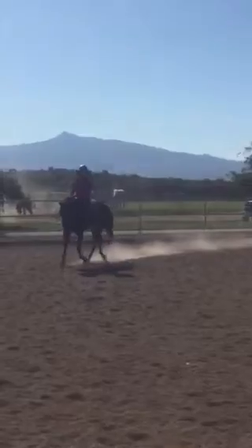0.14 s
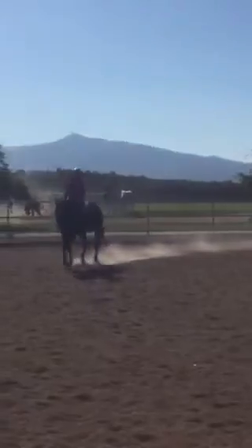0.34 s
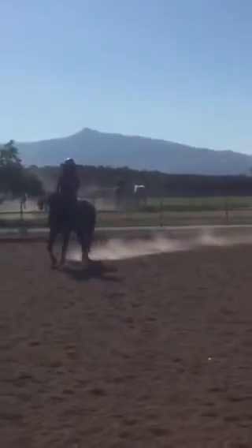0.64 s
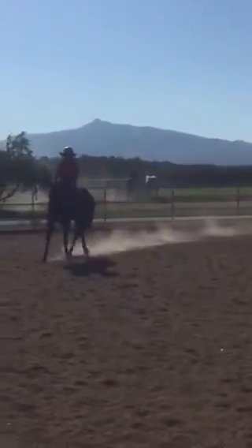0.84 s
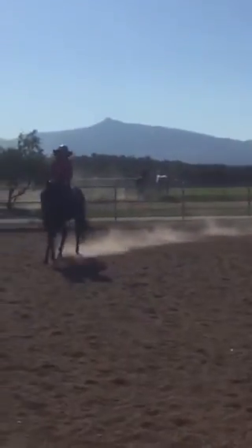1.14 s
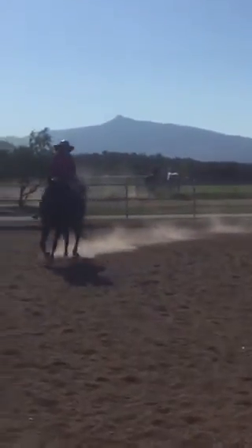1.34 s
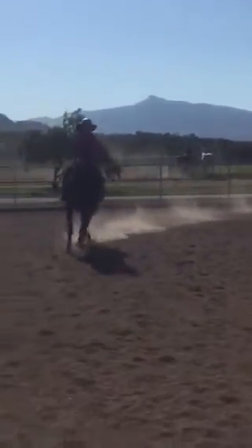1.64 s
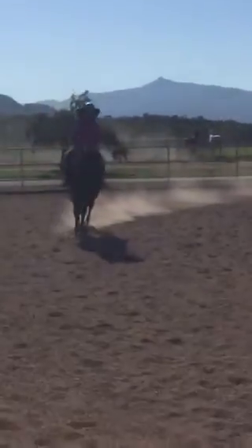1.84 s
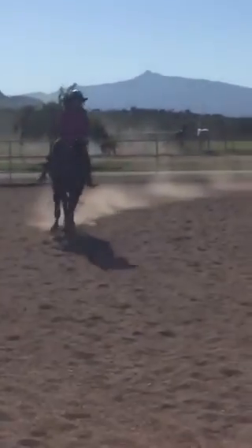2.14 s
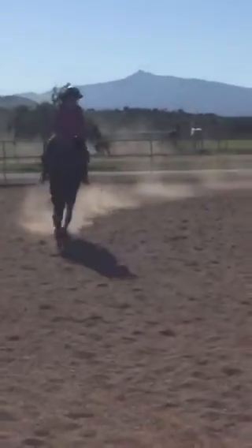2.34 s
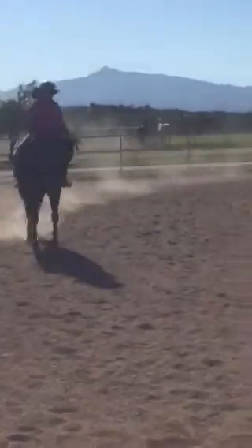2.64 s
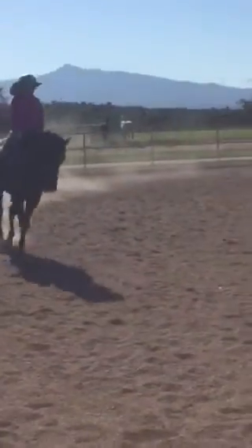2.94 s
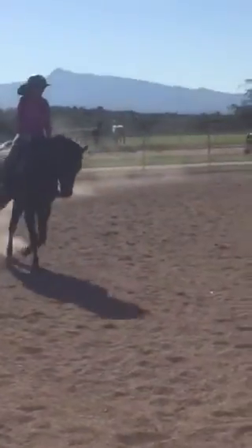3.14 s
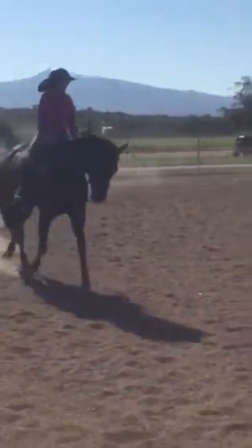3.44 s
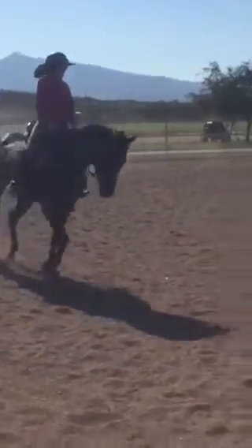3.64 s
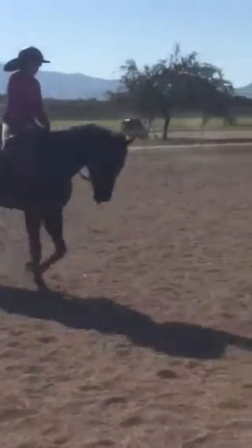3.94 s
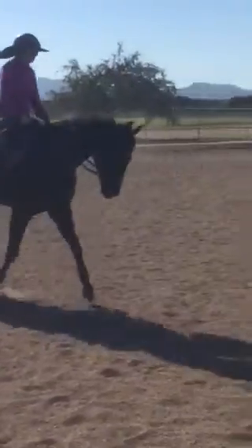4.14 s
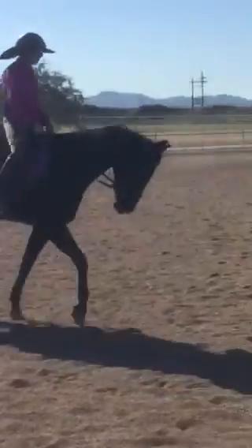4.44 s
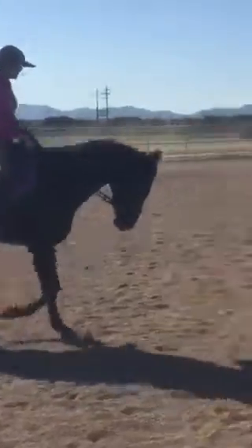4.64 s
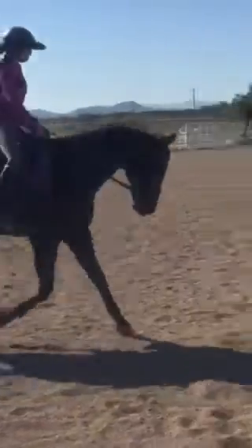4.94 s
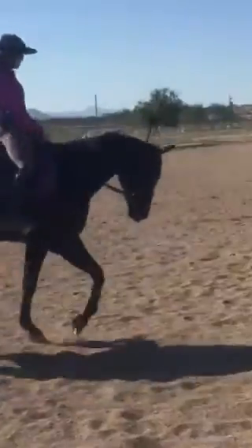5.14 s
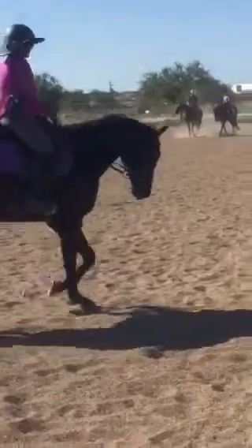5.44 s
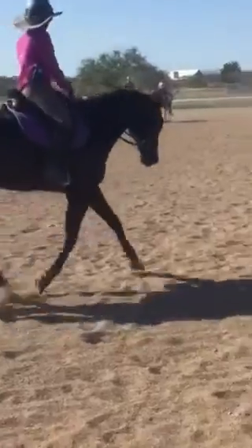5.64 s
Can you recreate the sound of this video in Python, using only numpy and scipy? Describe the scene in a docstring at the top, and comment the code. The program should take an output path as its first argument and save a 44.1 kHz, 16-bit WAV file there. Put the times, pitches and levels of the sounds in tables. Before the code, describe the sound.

A horse trots nearer across a sandy outdoor arena, heard through a hand-held phone. At first the air is quiet, with a faint hiss and low rumble of wind and ground, weak muffled hoof thuds and soft puffs of breath. A distant bird whistles at about 0.1, 1.5, 2.9 and 4.3 seconds, alternating with quick falling trills near 0.8, 2.2, 3.6 and 5.1. A small dry rustle comes at 1 second and a light click at 1.7. Fingers knock the phone case at 2.7, then loudest at 3.0 and 3.1, hard and hollow with a tiny bounce. From 3.3 the hoofbeats are closer and fuller, with dull scuffs, crunches, gritty ticks and bright swishes of sand from about 3.7 to 5.6. The rumble swells in lumps, strongest around 4.2. Two more clacks fall at about 5.55 and 5.6, then a short high chirp ends it.

```python
"""Open arena: a horse trots nearer on sand, heard from a hand-held phone.
Hooves are decaying low sines with noise crunches; breath is noise through resonances, in swells, a few of
them dull hoof scuffs; sand is clumped random grains. Fingers ring the modes of the phone's case. A far bird
sings swept sines with echoes. A dry rustle, the rumble of wind and ground and still air are shaped noise."""
import sys
import numpy as np
from scipy import signal
from scipy.fft import rfft, irfft, next_fast_len
from scipy.io import wavfile

SR = 44100
rng = np.random.default_rng(int(sys.argv[2]) if len(sys.argv) > 2 else 0)


def to_wav(s):
    """Save 16-bit WAV."""
    ch = np.atleast_2d(s).T  # columns
    pcm = np.round(np.clip(ch, -1, 1) * 32767)  # PCM
    wavfile.write(sys.argv[1], SR, pcm.astype(np.int16))


N = 255503


def from_db(db):
    """Decibels to amplitude gain."""
    return 10 ** (np.asarray(db) / 20)


def rms_one(x):
    """Scale to unit rms."""
    return x / np.sqrt(np.mean(x ** 2) + 1e-20)


def in_time(rows):
    """Interpolate each column of a time table to one value per sample."""
    t_s, *columns = np.transpose(rows)
    return [np.interp(np.arange(N) / SR, t_s, column) for column in columns]


def coloured(x, spectrum):
    """Filter by a (f/Hz, level/dB) curve on a log frequency axis; rms 1."""
    size = next_fast_len(N)
    hz = np.maximum(np.arange(size // 2 + 1) * SR / size, 1)
    curve_hz, curve_db = np.transpose(spectrum)
    gain = from_db(np.interp(np.log(hz), np.log(curve_hz), curve_db))
    return rms_one(irfft(rfft(x, size) * gain, size)[:N])


def drift(rate_hz):
    """Slow random curve: noise through two equal low-pass poles at rate_hz; rms 1."""
    r = np.exp(-2 * np.pi * rate_hz / SR)
    noise = rng.standard_normal(N + SR)
    return rms_one(signal.lfilter([1], [1, -2 * r, r * r], noise)[SR:])


def butter(order, hz, kind, x):
    """Butterworth filter."""
    return signal.sosfilt(signal.butter(order, hz, kind, fs=SR, output="sos"), x)


def add(out, t_s, sound):
    """Mix a short sound in at t_s."""
    start = round(t_s * SR)
    out[start:start + len(sound)] += sound[:N - start]


# hooves landing in sand: t/s, thud level/dB, crunch level/dB
HOOVES = [(0.106, -50, -90), (0.87, -50, -72), (0.961, -59, -65), (1.126, -63, -72.5), (1.796, -48, -82),
          (2.135, -52, -83), (2.164, -44.5, -87), (2.195, -46, -73), (2.422, -47.5, -74), (2.613, -51, -78),
          (2.789, -71, -75), (3.276, -41, -82), (3.358, -58.5, -63.5), (3.524, -56, -69.5),
          (3.553, -53, -79), (3.617, -43, -66.5), (3.706, -54, -59.5), (3.866, -40.5, -74.5),
          (4.007, -39, -76), (4.087, -42.5, -68.5), (4.341, -47, -65.5), (4.461, -46, -85),
          (4.713, -50, -74), (4.795, -36.5, -80), (4.811, -43.5, -63), (5.041, -48, -72.5),
          (5.076, -44, -68), (5.306, -50, -70), (5.46, -48, -72)]
THUD_MEDIAN_HZ, THUD_SPREAD_DB = 105.3, 1.15  # spread: 20 log10 of the pitch ratio


def hooves():
    """Each landing: a soft low push and a short crunch of packed sand."""
    out, t = np.zeros(N), np.arange(SR // 8) / SR
    for t_s, thud_db, crunch_db in HOOVES:
        thud_hz = THUD_MEDIAN_HZ * from_db(THUD_SPREAD_DB * rng.standard_normal())
        push = (t / 0.0077) * np.exp(1 - t / 0.0096)
        thud = np.sin(2 * np.pi * thud_hz * t) * push
        grains = rms_one(butter(3, [450, 2600], "band", rng.standard_normal(len(t))))
        crunch = grains * np.minimum(t / 0.0019, 1) * np.exp(-t / 0.015)
        add(out, t_s, from_db(thud_db) * thud + from_db(crunch_db) * crunch)
    return out


def resonate(x, hz, width_hz):
    """Two identical resonators in series, for steep flanks; about unit gain on top."""
    r = np.exp(-np.pi * width_hz / SR)
    stage = [(1 - r * r) / 2, 0, (r * r - 1) / 2, 1, -2 * r * np.cos(2 * np.pi * hz / SR), r * r]
    return signal.sosfilt([stage, stage], x)


# nostril resonances: f/Hz, width of one stage/Hz, level/dB
NOSTRILS = [(651, 317, -2), (1095, 340, 2.5), (1438, 126, -4.5), (1873, 224, -7), (2400, 290, -14.5)]
# puffs of breath, and short dull hoof scuffs (4.721, 5.096, 5.178, 5.472) made with the same resonances:
# middle t/s, half length/s, level/dB, lowest resonance/dB, tilt of the upper ones/(dB per octave)
PUFFS_AND_SCUFFS = [(0.241, 0.079, -68.5, -3, 1), (0.499, 0.069, -72.5, -17, -7),
                    (0.682, 0.1, -75, -20, -10), (0.979, .073, -63, -3.5, -2), (1.226, 0.053, -72, -18, -3),
                    (1.409, 0.032, -61.5, -24, -20), (1.697, 0.03, -62.5, 14.5, 7),
                    (1.808, 0.15, -74, 8.5, -31), (1.961, 0.053, -64, -34, -10),
                    (2.132, 0.086, -65.5, 3.5, -0.5), (2.25, 0.067, -73.5, 5.5, -2),
                    (2.555, 0.079, -66.5, -22, -8), (2.829, 0.2, -65, -15, -4.5),
                    (3.017, 0.082, -65, -7, -1), (3.095, 0.083, -65.5, -12, -12.5),
                    (3.258, 0.047, -56.5, -2.5, -22), (3.388, 0.053, -57.5, 3.5, -30),
                    (3.553, 0.057, -65, -11, -20), (4.003, 0.044, -60.5, 0.5, -8.5),
                    (4.376, 0.2, -71, 4.5, -8), (4.54, 0.084, -67, 8, -6), (4.661, 0.093, -65, -6, 2),
                    (4.721, 0.018, -54, 3.5, -8), (5.096, .038, -59.5, 5, -2),
                    (5.178, 0.028, -60, 12.5, -17), (5.31, 0.047, -67, -6, -22),
                    (5.472, 0.021, -58.5, 5.5, -3.5), (5.649, 0.094, -71.5, 5, 2)]
BREATH_DB = -73.5  # at 0 dB approach


def breath_and_scuffs(near_db):
    """Fluttering noise through nostril resonances: steady breath, puffs, and short dull hoof scuffs."""
    air = rng.standard_normal(N) * from_db(3.4 * drift(33))
    bands = np.array([from_db(level_db) * resonate(air, hz, width_hz)
                      for hz, width_hz, level_db in NOSTRILS])
    bands = bands / np.sqrt(np.mean(bands.sum(axis=0) ** 2))
    upper_hz = np.array(NOSTRILS)[1:, 0]
    octaves = np.log2(upper_hz / upper_hz[0])
    gains = np.ones_like(bands) * from_db(BREATH_DB + near_db + 1.17 * drift(15))
    t = np.arange(N) / SR
    for t_s, half_s, level_db, low_db, tilt_db in PUFFS_AND_SCUFFS:
        span = slice(max(round((t_s - half_s) * SR), 0), round((t_s + half_s) * SR))
        swell = np.cos(np.pi / 2 * (t[span] - t_s) / half_s) ** 2
        band_db = level_db + np.r_[low_db, tilt_db * octaves]
        gains[:, span] += from_db(band_db)[:, None] * swell
    return (gains * bands).sum(axis=0)


# colour of the grains: f/Hz, level/dB (relative density)
SAND = [(3500, -26), (5200, -16.5), (6000, -0.5), (7000, -1.5), (8000, -6.5), (9500, -2.5), (12600, -2),
        (15500, -11.5)]
# sand thrown up by a hoof: t/s, level/dB, fall time/s
SWISHES = [(1.21, -82, 0.028), (2.19, -81, 0.04), (2.316, -82, 0.03), (2.66, -85, 0.062),
           (3.356, -77.5, 0.035), (3.403, -78, 0.034), (3.685, -80.5, 0.043), (3.758, -69.5, 0.021),
           (3.798, -80, 0.05), (3.855, -69, 0.019), (4.075, -65.5, 0.018), (4.148, -69, 0.024),
           (4.18, -84, 0.1), (4.394, -73.5, 0.041), (4.491, -74.5, 0.031), (4.548, -82.5, 0.055),
           (4.807, -68, 0.036), (4.859, -72, 0.047), (4.944, -75.5, 0.037), (5.016, -86, 0.08),
           (5.154, -61.5, 0.018), (5.268, -71.5, 0.023), (5.303, -76, 0.034), (5.445, -81, 0.031),
           (5.627, -67.5, 0.039)]
GRAINS_PER_S = 9000  # median
TRICKLE_DB, TRICKLE_FOLLOWS = -87, 0.8  # at 0 dB approach; share of the approach in dB


def sand(near_db):
    """Dense clumped grains of random size; a steady trickle, and throws that start suddenly."""
    sizes = from_db(3.56 * np.minimum(rng.exponential(1, N), 5)) * rng.choice([-1, 1], N)
    falls = rng.random(N) < GRAINS_PER_S * from_db(3.0 * drift(40)) / SR
    level, t = from_db(TRICKLE_DB + TRICKLE_FOLLOWS * near_db), np.arange(SR // 4) / SR
    for t_s, level_db, fall_s in SWISHES:
        add(level, t_s, from_db(level_db) * np.minimum(t / 0.0071, 1) * np.exp(-(t / fall_s) ** 2))
    return coloured(sizes * falls, SAND) * level


# single larger grains: t/s, level/dB
GRIT = [(0.7258, -63), (1.3114, -62), (1.7769, -65.5), (3.059, -60), (3.329, -76), (3.5256, -58.5),
        (3.7614, -61.5), (4.1634, -62.5), (4.2959, -65), (5.1586, -57), (5.39, -61.5)]


def grit():
    """Each larger grain ticks: a decaying noise burst, band-passed."""
    out, t = np.zeros(N), np.arange(SR // 100) / SR
    for t_s, level_db in GRIT:
        burst = rng.standard_normal(len(t)) * np.exp(-t / 0.0015)
        add(out, t_s, from_db(level_db) * butter(1, [2500, 14000], "band", burst))
    return out


def ring(clicks, hz, t60_s):
    """A unit click sets a decaying sine of starting height 1 ringing."""
    r, w = from_db(-60 / (t60_s * SR)), 2 * np.pi * hz / SR
    return signal.lfilter([0, np.sin(w)], [1, -2 * r * np.cos(w), r * r], clicks + 1e-18)


# knocks: t/s, ring level/dB, body level/dB, crack level/dB, bounce below first contact/dB, body lag/s
KNOCKS = [(1.187, -69.5, -67, -90, 27, 0.0034), (1.471, -69, -46, -80, 22, 0.0021),
          (1.6894, -45, -45, -48, -2, .003), (2.7107, -37.5, -33.5, -42.5, 5.5, 0.0045),
          (2.904, -57, -40, -94, 11, 0.0016), (3.0236, -29, -26, -32, 15, 0.0021),
          (3.1356, -23, -21, -29.5, 22, .0037), (5.16, -62, -57, -81, 24, 0.0032),
          (5.5536, -41, -42, -45, -1.5, 0.0035), (5.608, -34, -30, -41, 16, 0.00532)]
# modes of the case, low, middle and high: f/Hz, level/dB, t60/s
CASE_BODY = [(108, -24, 0.079), (228, 4, 0.052), (300, -5, 0.042), (366, -7, 0.042), (616, -13, 0.046),
             (790, -15, 0.035)]
CASE_RING = [(1126, 8, 0.014), (1341, 10, .010), (1897, 0, 0.014), (2410, 4, 0.0073)]
CASE_CRACK = [(4435, 2, 0.0056), (5030, 6, 0.0035), (6910, 8.5, 0.002), (9170, 4, 0.0012),
              (10740, 1.5, 0.0013)]
BOUNCE_S, BOUNCE_DULL_DB = 0.0027, 17  # delay; extra loss of crack
BODY_SOFT_HZ, BUZZ_DB = 910, -10  # low-pass softening the body's start; buzz re ring level


def contacts():
    """Every knock touches twice: first contact, then a bounce with a duller crack."""
    first = np.array(KNOCKS)
    bounce = first + [BOUNCE_S, 0, 0, -BOUNCE_DULL_DB, 0, 0]
    bounce -= first[:, 4:5] * [0, 1, 1, 1, 0, 0]
    return np.r_[first, bounce]


def case_modes(rows):
    """Contacts ring all modes of the case; lower waves arrive later, the body swings by its own lag."""
    out = np.zeros(N)
    for modes, level_db in zip((CASE_RING, CASE_BODY, CASE_CRACK), rows[:, 1:4].T):
        for hz, mode_db, t60_s in modes:
            spot_db = 2.5 * rng.standard_normal(len(rows))  # each contact falls on another spot
            # harder knocks are shorter contacts and reach the highest modes
            harder_db = 0.93 * (level_db + 36) * max(np.log2(hz / 5000), 0)
            lag_s = rows[:, 5] if modes is CASE_BODY else 0.00048 + 0.66 / hz
            clicks = np.zeros(N + SR)
            at = ((rows[:, 0] + lag_s) * SR).round().astype(int)
            clicks[at] = from_db(level_db + mode_db + spot_db + harder_db)
            rung = ring(clicks[:N], hz, t60_s)
            out += butter(2, BODY_SOFT_HZ, "low", rung) if modes is CASE_BODY else rung
    return out


def case_buzz(rows):
    """Loose parts buzz briefly after each contact: decaying band noise."""
    out, t = np.zeros(N), np.arange(SR // 20) / SR
    for t_s, ring_db in rows[:, :2]:
        burst = rng.standard_normal(len(t)) * np.exp(-t / 0.005)
        add(out, t_s, from_db(ring_db + BUZZ_DB) * butter(2, [450, 4000], "band", burst))
    return out


def knocks():
    """Fingers knock on the phone's case: ringing modes and buzzing parts."""
    rows = contacts()
    return case_modes(rows) + case_buzz(rows)


def note(rows, level_db, pitch_factor, rough):
    """A sine on a pitch curve with soft ends; moving air on the long path makes it flutter."""
    at_s, hz, shape_db = np.transpose(rows)
    t = np.arange(at_s[0], at_s[-1], 1 / SR)
    ends = np.clip(np.minimum(t - at_s[0], at_s[-1] - t) / 0.0013, 0, 1)
    flutter = np.interp(t, at_s[0] + 0.002 * np.arange(40), rng.standard_normal(40))
    level = np.sqrt(2) * from_db(level_db + np.interp(t, at_s, shape_db))
    phase = 2 * np.pi * np.cumsum(pitch_factor * np.interp(t, at_s, hz)) / SR
    return level * ends * (1 + rough * flutter) * np.sin(phase)


# whistled phrases: main note t/s, main level/dB, upstroke level/dB, after-notes level/dB
WHISTLES = [(0.07, -67, -84.5, -79), (1.459, -67.5, -88, -77.5), (2.927, -68, -84, -91),
            (4.347, -65, -95, -77)]
# notes of the phrase: t from main note/s, f/Hz, level/dB; AFTER_NOTES lists several notes
UPSTROKE = [(-.053, 4340, -5), (-.008, 5440, 3), (-.002, 5300, -2)]
MAIN_NOTE = [(0, 3550, -14), (.008, 4040, -1), (.036, 4130, 0), (.042, 4080, -3), (.052, 3400, -12)]
AFTER_NOTES = [
    [(.06, 3400, -1.5), (.067, 3460, 0), (.075, 3420, -15)],
    [(.087, 2800, 4), (.11, 3220, -26), (.13, 3700, -1)],
]
# a shorter variant, list of notes: t/s, f/Hz, level/dB
SHORT_PHRASE = [
    [(5.735, 5550, -88), (5.747, 5950, -75), (5.76, 6070, -78)],
    [(5.762, 3800, -74), (5.77, 4240, -77), (5.789, 3850, -66)],
]


def whistles(out):
    """Whistled phrase: upstroke, main note, after-notes; the short variant sounds once."""
    for t_s, main_db, up_db, after_db in WHISTLES:
        add(out, t_s + UPSTROKE[0][0], note(UPSTROKE, up_db, 1, rough=0.9))
        add(out, t_s, note(MAIN_NOTE, main_db, 1, rough=0.3))
        for rows in AFTER_NOTES:
            add(out, t_s + rows[0][0], note(rows, after_db, 1, rough=0.9))
    for rows in SHORT_PHRASE:
        add(out, rows[0][0], note(rows, 0, 1, rough=0.25))


# trills: t/s, level/dB
TRILLS = [(0.842, -73.5), (2.21, -75.5), (3.639, -74.5), (5.083, -72)]
TRILL_TOP_HZ, TRILL_PITCH_RATIO = 4240, 0.893  # ratio per syllable
TRILL_STEP_S, TRILL_FADE_DB = 0.018, 0.8  # per syllable


def trills(out):
    """Six syllables stepping down in pitch and level, with small random offsets."""
    for t_s, level_db in TRILLS:
        for k in range(6):
            louder, higher = rng.standard_normal(2)
            hz = TRILL_TOP_HZ * TRILL_PITCH_RATIO ** k
            # hooks up to its pitch and falls away
            hook = [(0, 0.88 * hz, -9), (0.005, 1.03 * hz, 0), (0.014, 0.9 * hz, -8)]
            syllable_db = level_db - k * TRILL_FADE_DB + 1.5 * louder
            add(out, t_s + k * TRILL_STEP_S, note(hook, syllable_db, 1 + 0.02 * higher, rough=1.2))


ECHO_DB, ECHO_DECAY_S = -38, 0.035


def bird():
    """Two alternating phrases, blurred by many faint echoes from across the field."""
    out = np.zeros(N)
    whistles(out)
    trills(out)
    t = np.arange(SR // 4) / SR
    echoes = rng.standard_normal(len(t)) * np.exp(-t / ECHO_DECAY_S) * from_db(ECHO_DB)
    return out + signal.fftconvolve(out, echoes)[:N]


# brief dry rustle, one row: t/s, fall time/s, level/dB, low f/Hz, high f/Hz
RUSTLE = (.962, .05, -82, 3800, 6200)


def rustle():
    """A band of noise that starts suddenly and fades."""
    t_s, fall_s, level_db, low_hz, high_hz = RUSTLE
    out, t = np.zeros(N), np.arange(SR // 5) / SR
    noise = rms_one(butter(2, [low_hz, high_hz], "band", rng.standard_normal(len(t))))
    add(out, t_s, from_db(level_db) * noise * np.exp(-(t / fall_s) ** 2))
    return out


# rumble of wind and ground: t/s, deep level/dB, upper level/dB
RUMBLE = [(0.0, -55, -67), (1.4, -55.5, -68.5), (2.0, -56, -67), (2.37, -51, -66), (2.7, -49, -59),
          (3.02, -58, -55), (3.35, -55.5, -62), (3.75, -46.5, -54.5), (4.08, -50.5, -68.5),
          (4.2, -42.5, -63), (4.4, -48, -58), (4.6, -45.5, -58.5), (5.27, -55.5, -61), (5.79, -46.5, -60.5)]
# colours of the two layers: f/Hz, level/dB (relative density)
DEEP = [(15, -40), (25, -40), (35, -21), (45, 0), (81, 2), (114, -2.5), (161, -11.5), (200, -14),
        (260, -45), (440, -120)]
UPPER = [(76, -29), (130, -6.5), (225, -8.5), (397, -26.5), (651, -27), (900, -36.5), (1170, -55.5),
         (1980, -120)]


def rumble():
    """Lumpy low noise of wind and ground in two layers, each with its own level drift."""
    deep_db, upper_db = in_time(RUMBLE)
    deep = coloured(rng.standard_normal(N), DEEP) * from_db(deep_db + 1.68 * drift(8.9))
    upper = coloured(rng.standard_normal(N), UPPER) * from_db(upper_db + 4.4 * drift(14.5))
    return deep + upper


# colour of the still air: f/Hz, level/dB (relative density)
AIR = [(180, -28), (300, 5.5), (500, -24), (850, -9.5), (1170, -5.5), (1500, -9), (2400, -20), (4500, -22),
       (7700, -25.5), (12100, -25.5), (15800, -32.5)]
AIR_DB = -76


def still_air():
    """Coloured noise at a slightly drifting level."""
    return from_db(AIR_DB + 0.52 * drift(5.5)) * coloured(rng.standard_normal(N), AIR)


# the horse comes nearer (steady breath and trickling sand): t/s, level/dB
APPROACH = [(0, -16.5), (1.6, -5), (2.6, -6.5), (3.0, 1.5), (3.9, 0), (4.3, 1.5), (5.79, 3.5)]


def scene():
    """All sources over the still air of the arena, one channel."""
    near_db, = in_time(APPROACH)
    horse = hooves() + breath_and_scuffs(near_db) + sand(near_db) + grit()
    return (horse + knocks() + bird() + rustle() + rumble() + still_air())[None]


LOW_CUT_HZ, TOP_CUT_HZ = 70, 15250


def record(dry):
    """The microphone loses the deepest bass; the top is cut steeply."""
    thin = butter(2, LOW_CUT_HZ, "high", dry)
    # 0.5 dB ripple, 55 dB stop band
    return signal.sosfilt(signal.ellip(10, 0.5, 55, TOP_CUT_HZ, fs=SR, output="sos"), thin)


dry = scene()
out = record(dry)
to_wav(out)
```